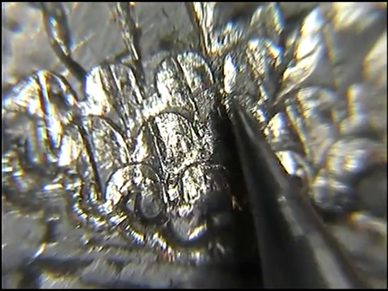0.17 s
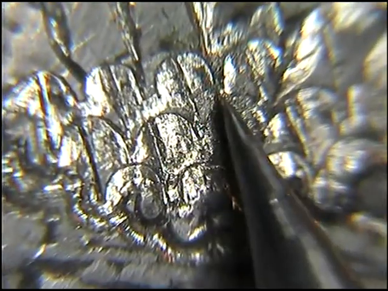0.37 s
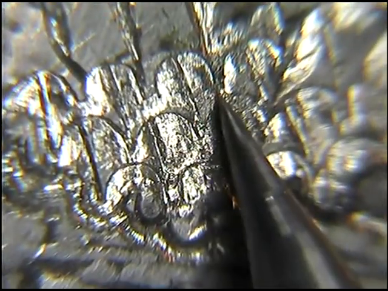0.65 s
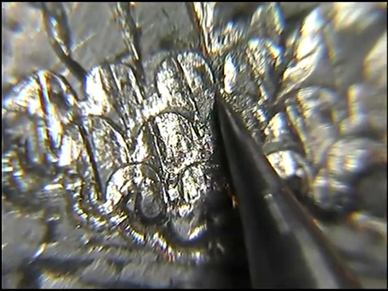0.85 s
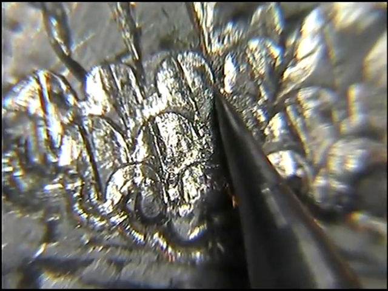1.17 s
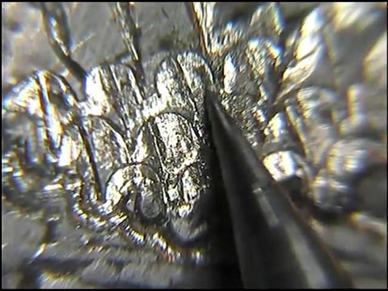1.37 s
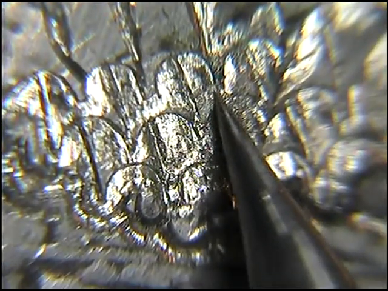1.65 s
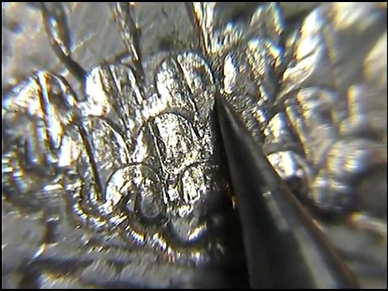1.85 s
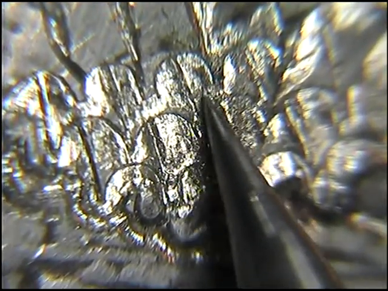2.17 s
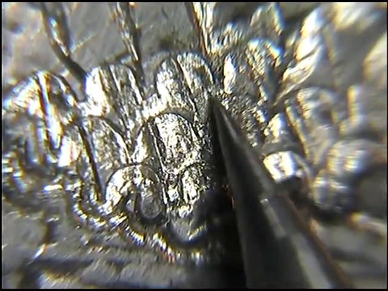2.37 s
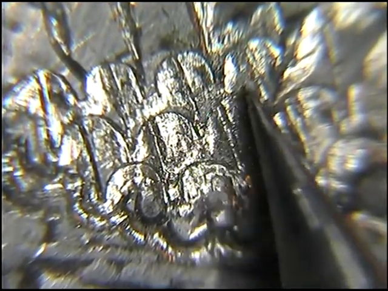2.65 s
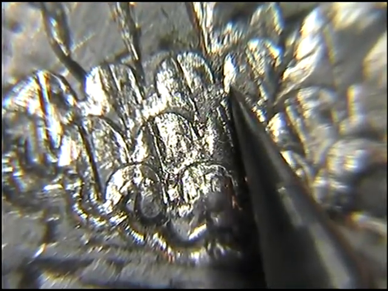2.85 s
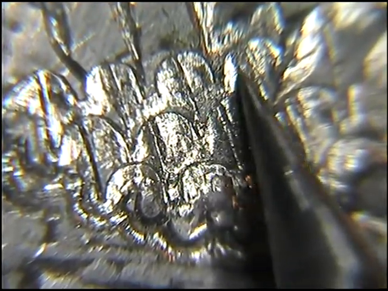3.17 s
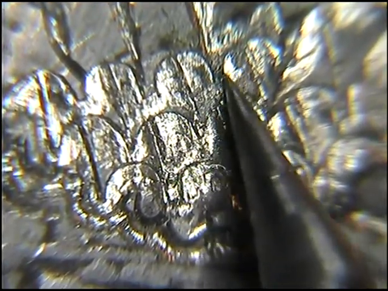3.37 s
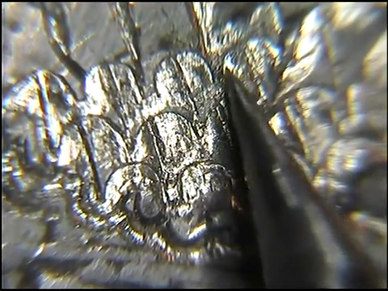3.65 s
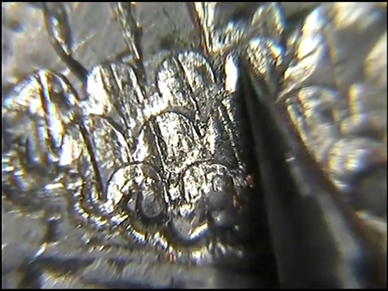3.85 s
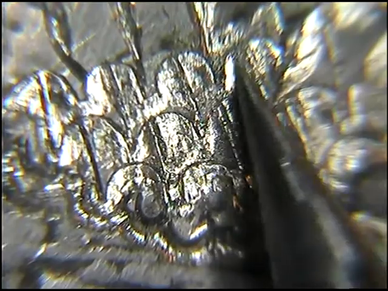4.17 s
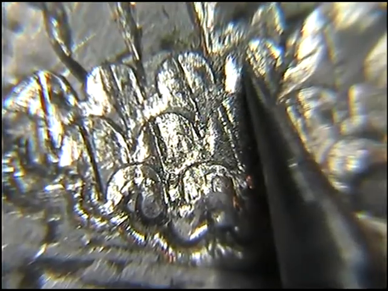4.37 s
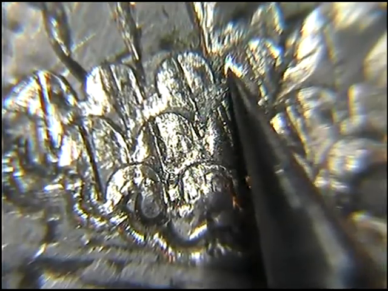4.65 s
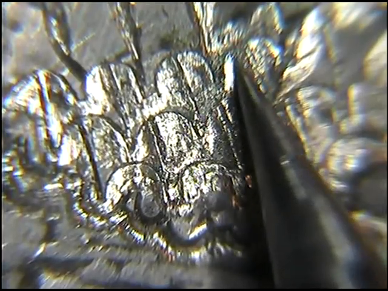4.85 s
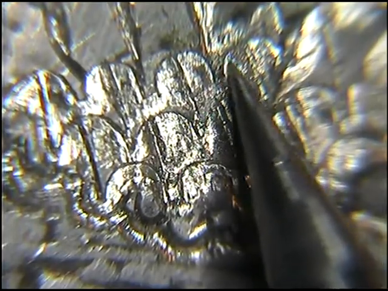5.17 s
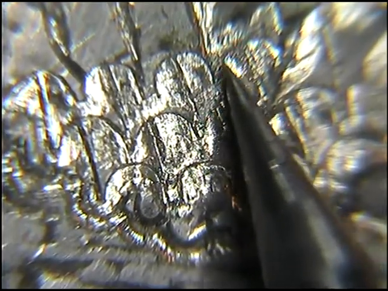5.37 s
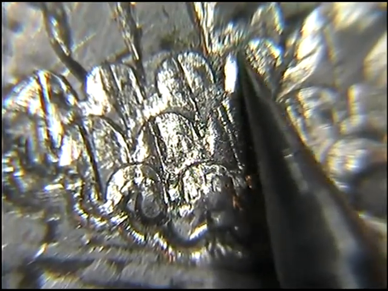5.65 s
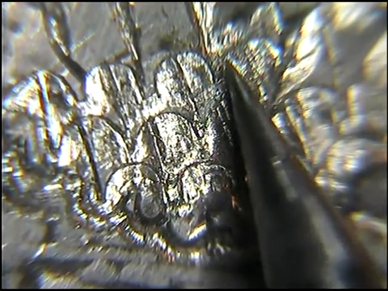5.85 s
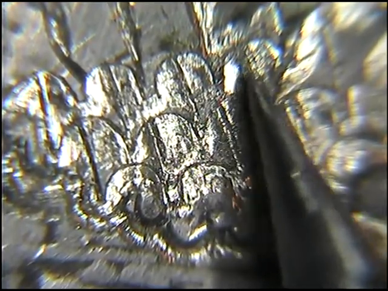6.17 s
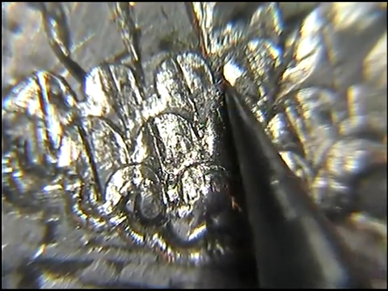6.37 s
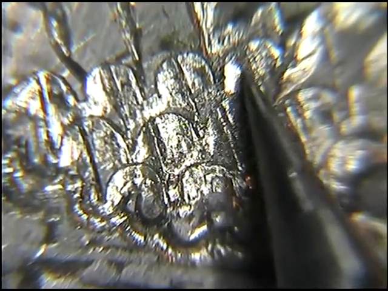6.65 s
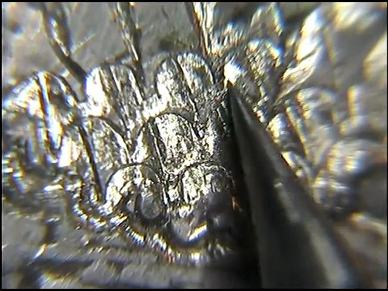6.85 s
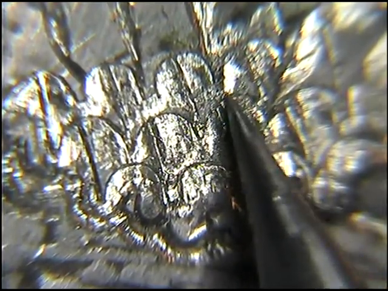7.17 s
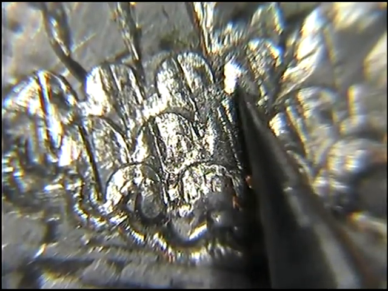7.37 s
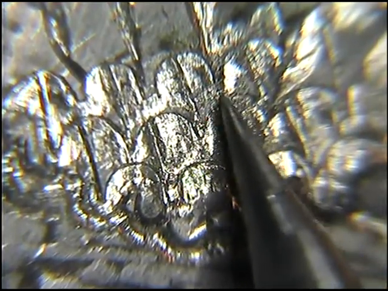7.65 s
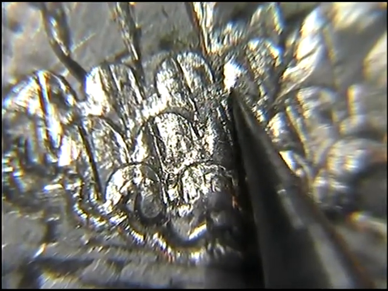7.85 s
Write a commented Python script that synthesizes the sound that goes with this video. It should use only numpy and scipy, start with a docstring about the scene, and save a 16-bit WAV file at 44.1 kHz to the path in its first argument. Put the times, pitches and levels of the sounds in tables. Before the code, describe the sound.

Close, steady electric rotary tool whine with a fluttering throb, broken by buzzy, gritty cutting bursts as the tip touches metal.

```python
"""A high-speed rotary engraving handpiece runs close to the microphone at about 564 turns a second.
From the start, rotor and bearing tones whine and throb over a bright rushing hiss and a faint rumble.
From about one second on, the burr is set on a small metal coin again and again: light touches first,
singing at the flute rate as a rough sine, then mostly firmer ones, where the tip bounces and rasps as
irregular strikes ring its resonances. After the last stroke the handpiece runs on alone."""
import sys
import numpy as np
from scipy import signal
from scipy.fft import rfft, irfft
from scipy.io import wavfile
from scipy.ndimage import uniform_filter1d

SR = 44100
rng = np.random.default_rng(int(sys.argv[2]) if len(sys.argv) > 2 else 0)


def master(y):
    """Save y as 16-bit WAV."""
    cut = np.clip(np.atleast_2d(y).T, -1, 1)
    pcm = np.round(cut * 32767)  # scale
    wavfile.write(sys.argv[1], SR, pcm.astype(np.int16))


N = 352781
TIME = np.arange(N) / SR  # s
FREQS = np.maximum(np.fft.rfftfreq(N, 1 / SR), 1)  # Hz


def from_db(db):
    """Decibels to gain."""
    return 10 ** (np.asarray(db) / 20)


def rms_one(x):
    """Scale to unit rms."""
    return x / np.sqrt(np.mean(x ** 2) + 1e-20)


def in_time(rows):
    """Each column of a (seconds, ...) curve, sample by sample."""
    seconds, *columns = np.transpose(rows)
    return [np.interp(TIME, seconds, column) for column in columns]


def over_freqs(points):
    """A (Hz, value) curve joined on a log-frequency axis."""
    hz, value = np.transpose(points)
    return np.interp(np.log(FREQS), np.log(hz), value)


def drift(corner_hz):
    """Smooth random wandering of spread 1: noise through two equal one-pole low-passes."""
    step = 20  # samples between the points of the slow curve
    pole = np.exp(-2 * np.pi * corner_hz * step / SR)
    noise = rng.standard_normal(N // step + 2002)
    slow = signal.lfilter([1], [1, -2 * pole, pole * pole], noise)[2000:]  # skip the filter's start
    return np.interp(np.arange(N) / step, np.arange(len(slow)), rms_one(slow))


def panned(x, pan_db):
    """Place a sound between left and right at constant power; positive leans left."""
    gains = from_db(np.array([[pan_db], [-pan_db]]) / 2)
    return rms_one(gains) * x


def resonate(x, modes):
    """Ring parallel two-pole resonances of alternating sign."""
    out = 0
    for k, (hz, width_hz, db) in enumerate(modes):
        radius = np.exp(-np.pi * width_hz / SR)
        b = (1 - radius ** 2) / 2 * np.array([1, 0, -1])
        a = [1, -2 * radius * np.cos(2 * np.pi * hz / SR), radius ** 2]
        out = out + (-1) ** k * from_db(db) * signal.lfilter(b, a, x + 1e-18)
    return out


def band(x, low_hz, high_hz):
    """Band-pass with steep edges."""
    return signal.sosfilt(signal.butter(4, [low_hz, high_hz], "band", fs=SR, output="sos"), x)


def stereo_noise(spectrum):
    """Coloured noise of unit rms whose channels are most alike in the upper mids, least in the treble."""
    # Balance of the noise. Each row: frequency in Hz, left over right in dB.
    balance = [(100, -1), (700, -5), (1300, -3), (2400, -.5), (4400, -5), (7500, -2), (15000, -4)]
    # Likeness of the channels. Each row: frequency in Hz, likeness from 0 to 1.
    likeness = [(100, 0.64), (1500, 0.88), (3500, 1), (7000, 0.25), (15000, 0.31)]
    mid, side = rfft(rng.standard_normal((2, N)))
    alike = np.clip(over_freqs(likeness), 0, 1)
    sign = np.array([[1], [-1]])  # left, right
    both = np.sqrt(1 + alike) * mid + sign * np.sqrt(1 - alike) * side
    colour_db = over_freqs(spectrum) + sign * over_freqs(balance) / 2
    return rms_one(irfft(both * from_db(colour_db), N))


def spindle_turns(wander=0.036):
    """Turns made so far: the summed spindle speed, with a tiny wander in turns per s."""
    # Spindle speed. Each row: time in seconds, speed in turns per second.
    speed = [(0.05, 564.4), (0.81, 562.8), (3.81, 566.6), (6.61, 562.2), (7.9, 562.4)]
    return np.cumsum(in_time(speed)[0] + wander * drift(5.5)) / SR


def throb_angle():
    """Phase of the slow throb in radians, starting on a crest."""
    # Pace of the throb in the whine. Each row: time in seconds, throbs per second.
    pace = [(0.0, 8.76), (0.85, 8.07), (1.05, 6.78), (1.5, 8.45), (2.0, 6.38), (2.2, 8.15), (2.65, 8.1),
            (3.0, 5.96), (3.45, 7.34), (4.65, 8.37), (5.0, 6.8), (5.25, 7.59), (6.25, 8.1), (6.85, 7.29),
            (7.1, 8.74), (7.35, 6.26), (8.0, 8.1)]
    return 2 * np.pi * np.cumsum(in_time(pace)[0]) / SR


def whine(turns, throb, rough=0.03, slip=0.098, flutter_hz=35, throb_bend=0.5, throb_share=0.64, waver_db=1.13):
    """Rotor harmonics hold steadier; bearing tones flutter and waver as the balls slip, some swell and bend
    with the throb. Slip and bend are in radians."""
    # Tones of the rotor and its bearings. Each row: multiple of the spindle speed, level in dB,
    # left over right in dB, throb depth from 0 to 1.
    partials = [(0.573, -57.4, -4, 0.1), (1.0, -34.2, -5, 0.1), (2.0, -50.7, -2, 0.1),
                (3.0, -45.6, -1, 0.1), (3.819, -52.2, 0, 0.1), (4.0, -46.7, -3, 0.1),
                (4.352, -52.2, -1, 0.1), (5.0, -45.7, 0, 0.1), (6.04, -45.3, -1, 0.1),
                (6.383, -44.1, -2, 0.1), (6.457, -46.7, -2, 0.1), (6.707, -46.1, -1, 0.0),
                (7.0, -45.7, -1, 0.1), (7.243, -48.0, -2, 0.1), (8.589, -34.9, -7, 0.1),
                (9.589, -40.3, -5, 0.1), (9.682, -36.4, -7, 0.1), (10.0, -23.6, -7, 0.1),
                (10.411, -28.6, -7, 0.1), (10.808, -33.2, -8, 0.0), (11.255, -40.3, -6, 0.0),
                (11.654, -31.8, -4, 0.1), (11.666, -40.0, -4, 0.1), (11.883, -39.9, -4, 0),
                (12.038, -40.1, -5, 0.3), (12.412, -27.2, -2, 0.35), (12.455, -40.0, -2, 0.1),
                (12.88, -20.9, -1, 0.6), (13.196, -34.7, 0, 0.1), (13.308, -37.2, 0, 0.1),
                (13.622, -38.5, -1, 0.1), (13.716, -36.5, -1, 0.5), (13.883, -34.4, 2, 0.1),
                (14.05, -40.0, 1, 0), (14.469, -40.7, -4, 0.1), (14.871, -36.3, -5, 0),
                (16.117, -31.4, 1, 0.1), (16.176, -44.2, -2, 0.1), (16.419, -41.0, 0, 0),
                (16.669, -35.6, 0, 0.1), (16.749, -42.8, -3, 0.1), (16.871, -42.8, -3, 0.2),
                (17.177, -26.7, -5, 0.1), (17.27, -39.5, -3, 0.1), (17.495, -31.8, -3, 0.1),
                (18.073, -42.3, -6, 0.1), (18.117, -30.0, -5, 0.1), (19.246, -43.4, -6, 0.1),
                (20.092, -44.1, -6, 0.1), (21.0, -46.2, -4, 0.1), (21.471, -31.9, -4, 0.1),
                (21.823, -37.4, -1, 0.1), (22.057, -38.3, -8, 0.1), (22.115, -37.4, -7, 0.1),
                (22.901, -42.1, -4, 0.1), (23.824, -36.9, -1, 0.1), (25.766, -40.7, -4, 0.1)]
    out = np.zeros((2, N))
    swell, bend = throb_share * np.cos(throb), throb_bend * np.sin(throb)
    # the tones draw on a shared pool of random motions
    flutters = [drift(flutter_hz) for _ in range(13)]
    wavers = [from_db(waver_db * drift(5.5)) - 1 for _ in flutters]
    for multiple, db, pan_db, depth in partials:
        is_harmonic = multiple == round(multiple)
        loose = min(multiple / 10, 1) * (0.5 if is_harmonic else 1)
        shake, slide = rng.choice(len(flutters), size=2, replace=False)
        angle = 2 * np.pi * ((multiple * turns + rng.random()) % 1)
        angle = angle + slip * loose * flutters[slide] + depth * bend
        level = (1 + depth * swell) * (1 + loose * (rough * flutters[shake] + wavers[slide]))
        tone = np.sqrt(2) * level * np.sin(angle.astype(np.float32))
        out += panned(from_db(db) * tone, pan_db)
    return out


def shimmer(turns, count=44, spread_db=1.0, tilt_db=-6, pan_db=-3):
    """Bearing flaws mix into a crowd of faint, unrelated high tones that follow the spindle speed."""
    out = 0
    multiples = rng.uniform(10, 27, count)
    for multiple, chance, start in zip(multiples, rng.standard_normal(count), rng.random(count)):
        angle = 2 * np.pi * ((multiple * turns + start) % 1)
        level_db = spread_db * chance + tilt_db * np.log2(multiple)  # tilt is per octave
        out = out + from_db(level_db) * np.sin(angle.astype(np.float32))
    return panned(rms_one(out), pan_db)


def stroke_level(touch_s=0.02, lift_s=0.024):
    """Each stroke bites quickly, swells in an arch to its strongest moment, eases off and lifts."""
    # Strokes of the burr on the coin. Each row: set down, strongest and lifted in seconds,
    # level at the strongest moment in dB, swell from the ends to that moment in dB.
    strokes = [(0.995, 1.22, 1.305, -24, 5), (1.70, 1.98, 2.025, -22.5, 5), (2.752, 2.77, 2.81, -19.5, 8),
               (2.81, 2.92, 3.08, -18.7, 3), (3.08, 3.39, 3.78, -19.3, 4), (3.78, 3.88, 4.14, -19, 5),
               (4.168, 4.25, 4.565, -18.6, 8), (4.73, 4.78, 4.965, -18.5, 6), (5.02, 5.47, 5.79, -20.6, 4),
               (5.79, 5.83, 5.86, -19, 4), (6.315, 6.39, 6.525, -18.7, 5), (6.768, 6.83, 6.876, -16, 5),
               (7.162, 7.2, 7.215, -23.2, 4), (7.312, 7.375, 7.47, -16.2, 9), (7.565, 7.585, 7.605, -31, 3),
               (7.76, 7.79, 7.85, -21.4, 7)]
    level = np.zeros(N)
    for down, strongest, up, db, swell_db in strokes:
        nearest_end = np.minimum((TIME - down) / touch_s, (up - TIME) / lift_s)
        touching = np.clip(nearest_end + 0.5, 0, 1)
        off_crest = np.interp(TIME, [down, strongest, up], [-1, 0, 1])
        level += touching * from_db(db - swell_db * off_crest ** 2)
    return level


def contact(ease_s=0.08, catch_db=9, catch_hz=13):
    """Strength of flute tone and chatter: pressure shifts power into chatter and makes the tone fitful."""
    # How firmly the hand presses. Each row: time in seconds,
    # pressure from 0, a pure singing tone, to 1, pure chatter.
    firmness = [(1.0, 0.16), (1.73, .1), (1.92, 0.5), (1.99, 0.2), (2.77, 0.4), (2.86, 1), (2.93, 0.23),
                (3.05, 0.3), (3.13, 0.74), (4.2, .68), (4.5, 0.85), (4.78, 0.4), (4.88, 0.94), (5.47, 0.55),
                (5.7, .82), (6.42, 0.76), (6.53, .4), (6.83, .22)]
    level = stroke_level()
    # pressure builds as the burr lands and eases as it lifts
    seated = uniform_filter1d((level > 0) * 1.0, int(ease_s * SR))
    pressure = np.clip(in_time(firmness)[0] * seated, 0.02, 0.98)
    # the tone catches and drops out, up to catch_db either way at full pressure
    catching = from_db(catch_db * pressure * np.tanh(drift(catch_hz)))
    singing = level * np.sqrt(1 - pressure) * catching
    chattering = level * np.sqrt(pressure)
    return singing, chattering


def bite(turns, uneven=0.24):
    """The tip whirls with the bearing cage and balls, so it digs deep on some turns and misses on others."""
    # cycles per turn; the swings are shares of a bite of 1
    cage_ratio, ball_ratio = 0.424, 0.312
    cage = 1.25 * np.cos(2 * np.pi * cage_ratio * turns)
    balls = 0.25 * np.cos(2 * np.pi * ball_ratio * turns)
    return np.maximum(1 + cage + balls + uneven * drift(250), 0)


def flute_tone(turns, depth, flutes=6, rough=0.37, wobble=0.19, whirl_share=0.065):
    """The flutes shave the metal one after another: a rough tone at six times the spindle speed."""
    level = (1 + whirl_share * (depth - 1)) * (1 + rough * drift(190))
    angle = 2 * np.pi * flutes * turns + wobble * drift(50)
    return rms_one(level * np.sin(angle))


def knocks(turns, depth, jitter_turns=0.017, grit=0.06):
    """The tip strikes about once a turn, and each strike tears off gritty chips, a noise that dies away."""
    place = turns + jitter_turns * drift(280)
    # each strike is shared between the two samples around its exact moment
    passed = np.floor(place) + np.clip(place % 1 / np.gradient(turns), 0, 1)
    strikes = np.diff(passed, prepend=passed[0])
    chips = grit * rng.standard_normal(N) * (1 - place % 1) ** 2
    return depth * (strikes + chips)


def cutting(turns, singing, chattering, flute_db=0.5, chatter_db=0, bench_db=-32, patchy_db=2,
            pan_db=-1.0, bench_pan_db=-2.0):
    """The burr on the coin: flute tone, chatter in the tip's resonances and a dull buzz through the bench."""
    # Resonances of burr and coin. Each row: frequency in Hz, width in Hz, level in dB.
    tip_modes = [(890, 70, -18), (2265, 60, -8), (2530, 160, -9), (2835, 140, -4), (3070, 90, 1.5),
                 (3310, 340, -2), (3700, 180, -7)]
    # Resonances of work holder and bench. Each row: frequency in Hz, width in Hz, level in dB.
    bench_modes = [(174, 16, -2.5), (250, 19, -12), (390, 27, -6)]
    depth = bite(turns)
    blows = knocks(turns, depth)
    tone = from_db(flute_db) * singing * flute_tone(turns, depth)
    tip_ring = rms_one(band(resonate(blows, tip_modes), 970, 4470))
    rasp = from_db(chatter_db) * chattering * tip_ring
    bench_ring = rms_one(band(resonate(blows, bench_modes), 160, 490))
    buzz = from_db(bench_db + patchy_db * drift(5.9)) * chattering * bench_ring
    return panned(tone + rasp, pan_db) + panned(buzz, bench_pan_db)


def hiss(turns, throb, pulsing=0.067, throb_db=-0.35, flicker_db=0.58):
    """Rushing noise of air and bearings, pulsing with every turn and dipping a little on the throb's crests."""
    # Spectrum of the rush. Each row: frequency in Hz, relative density in dB per Hz.
    rush = [(150, -52), (190, -22), (620, -19.5), (750, -13.5), (1050, -15.5), (1600, -8), (1850, -13.5),
            (2500, -6), (3300, -7.5), (4700, -1), (7800, 2.5), (8700, -5), (9800, -1.5), (15300, -11)]
    gain = from_db(throb_db * np.cos(throb) + flicker_db * drift(11.0))
    return stereo_noise(rush) * gain * (1 + pulsing * np.cos(2 * np.pi * turns))


def rumble():
    """Faint room rumble: steady noise weighted to the lowest octaves."""
    # Spectrum of the rumble. Each row: frequency in Hz, relative density in dB per Hz.
    low_end = [(20, -21), (50, 11), (85, -7), (115, -30), (300, -53)]
    return stereo_noise(low_end)


def at_ports(x):
    """The right port hears the tool a little later, by an amount that changes with frequency."""
    # Phase by which the left port leads the right. Each row: frequency in Hz, lead in radians.
    port_phase = [(0, 0.43), (2070, 0.28), (2840, 0.97), (3190, 0.39), (4650, 0), (6980, 1.21),
                  (8610, 0.44), (9910, 0.68), (10200, 1.1), (10600, 1.5), (12600, 1.4), (12900, 1.6),
                  (14500, 1), (15400, 0.4)]
    lead = np.interp(FREQS, *np.transpose(port_phase))
    return np.array([x[0], irfft(rfft(x[1]) * np.exp(-1j * lead), N)])


def scene(whine_db=0, shimmer_db=-30, hiss_db=-19.0, rumble_db=-66, whine_damping_db=-0.96, hiss_damping_db=-0.67):
    """The running handpiece, its cuts and the room; the left port hears the tool a little earlier."""
    turns = spindle_turns()
    throb = throb_angle()
    singing, chattering = contact()
    # pressing on the coin steadies the bearings, so they run a little quieter
    load = uniform_filter1d(chattering, SR // 2)
    load = load / load.max()
    tones = from_db(whine_db) * whine(turns, throb) + from_db(shimmer_db) * shimmer(turns)
    tones = from_db(whine_damping_db * load) * tones
    rushing = from_db(hiss_db + hiss_damping_db * load) * hiss(turns, throb)
    tool = tones + rushing + cutting(turns, singing, chattering)
    return at_ports(tool) + from_db(rumble_db) * rumble()


def record(dry, cutoff_hz=15350, offset=-0.031):
    """The recorder cuts the top with a steep low-pass and adds a small steady offset."""
    low_pass = signal.ellip(10, 0.1, 90, cutoff_hz, fs=SR, output="sos")
    return signal.sosfilt(low_pass, dry) + offset


dry = scene()
out = record(dry)
master(out)
```